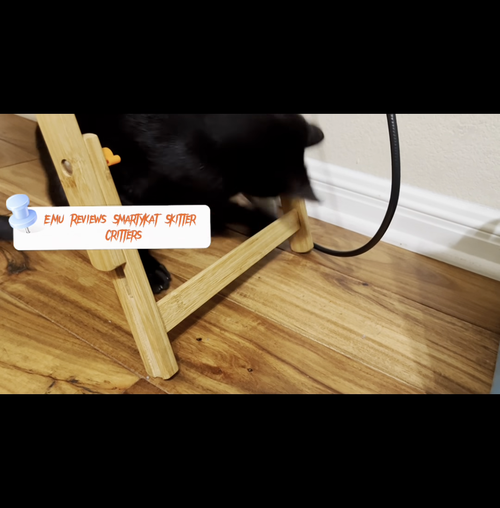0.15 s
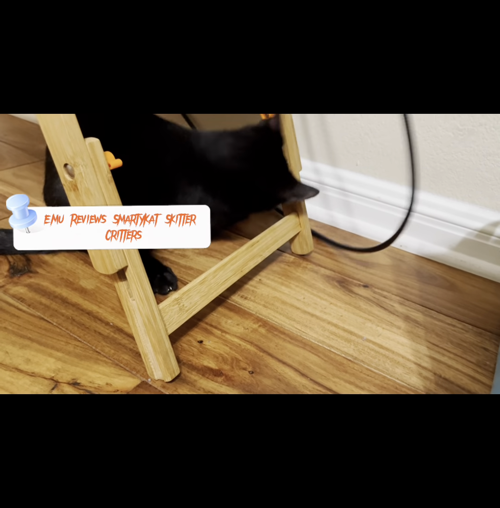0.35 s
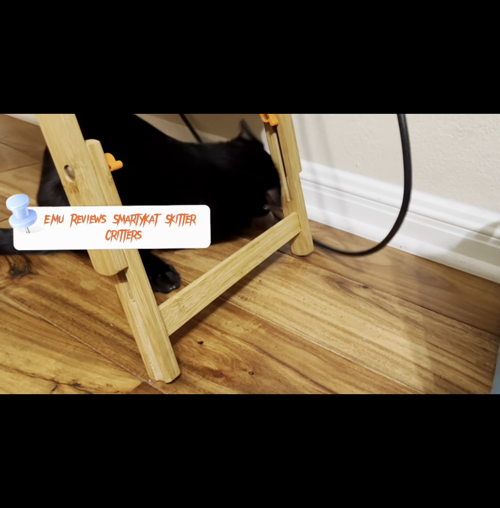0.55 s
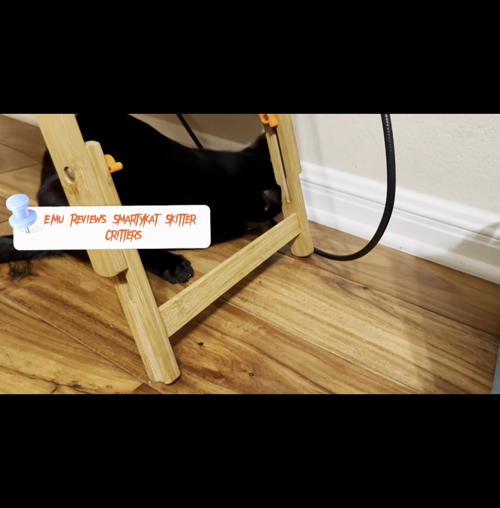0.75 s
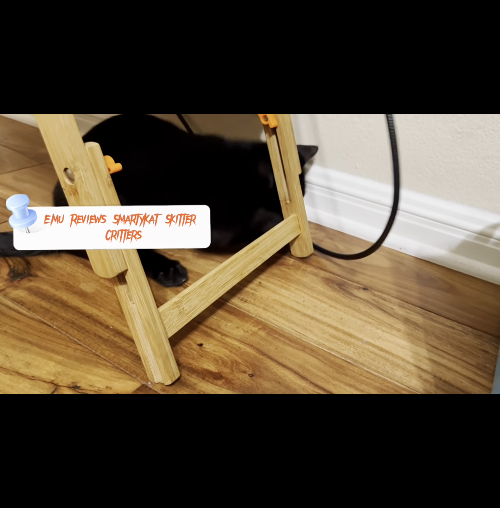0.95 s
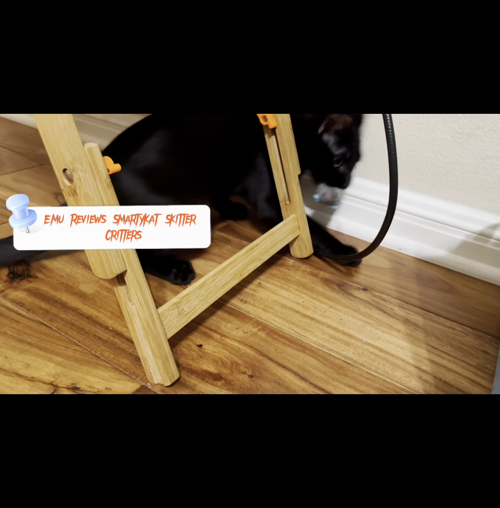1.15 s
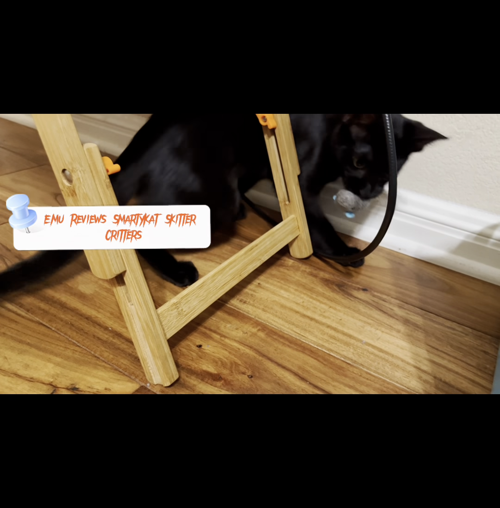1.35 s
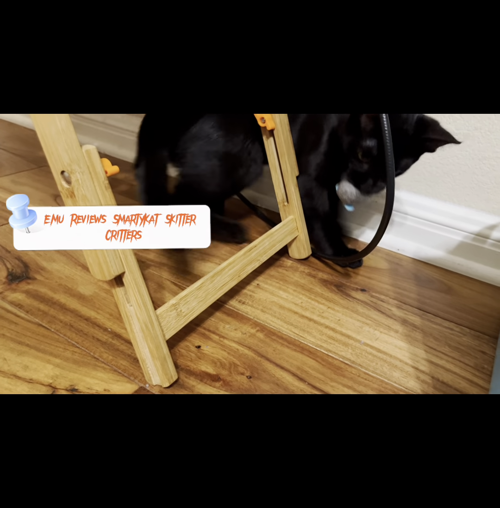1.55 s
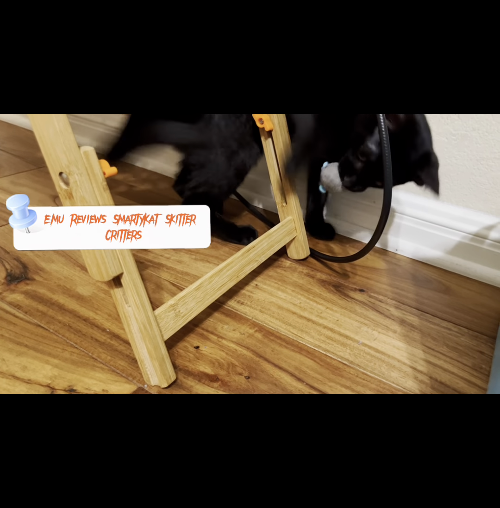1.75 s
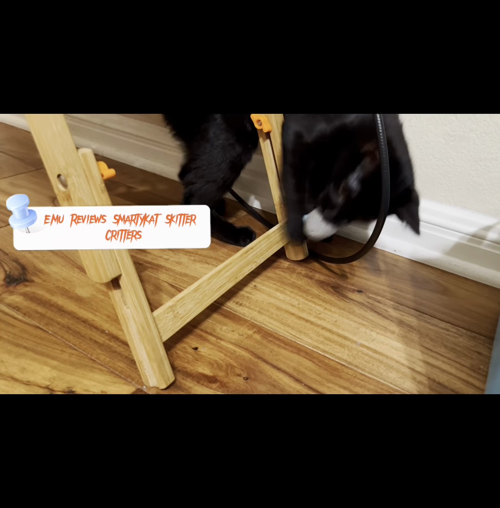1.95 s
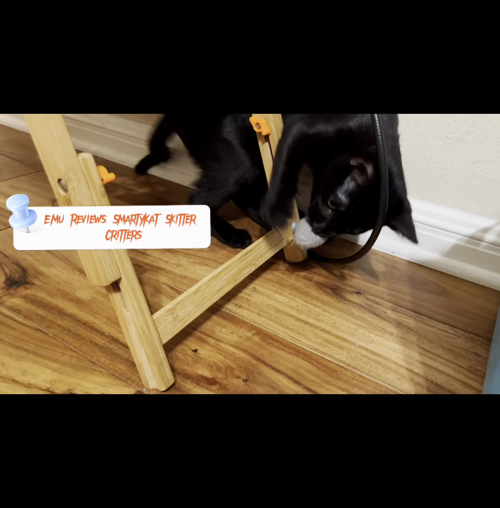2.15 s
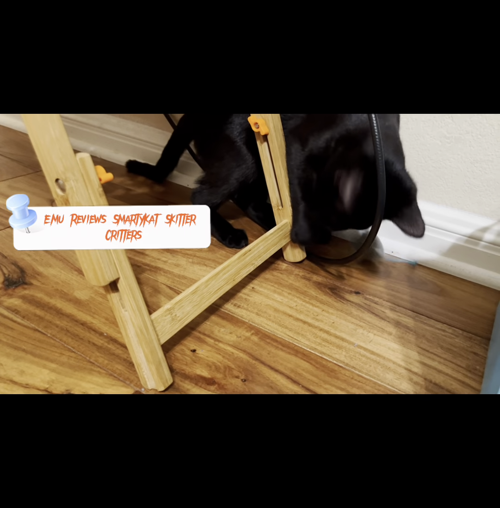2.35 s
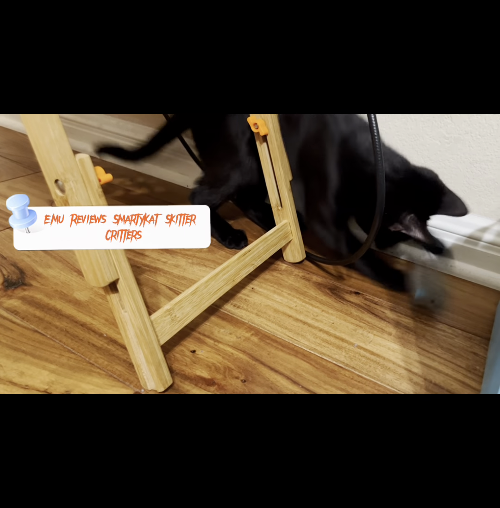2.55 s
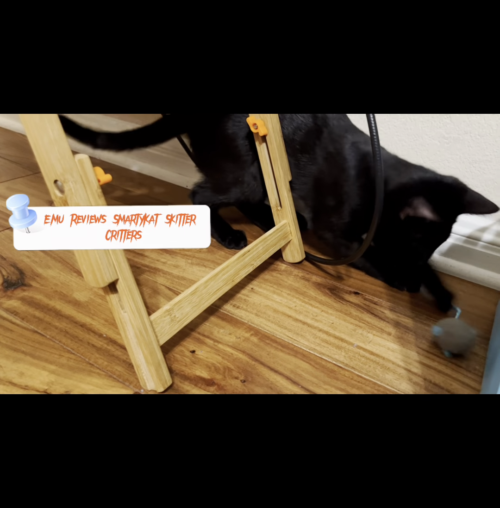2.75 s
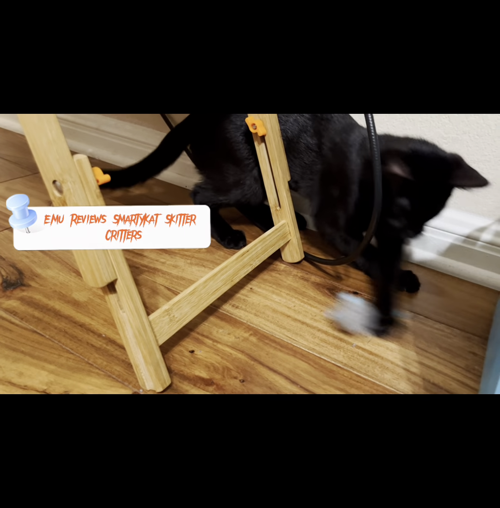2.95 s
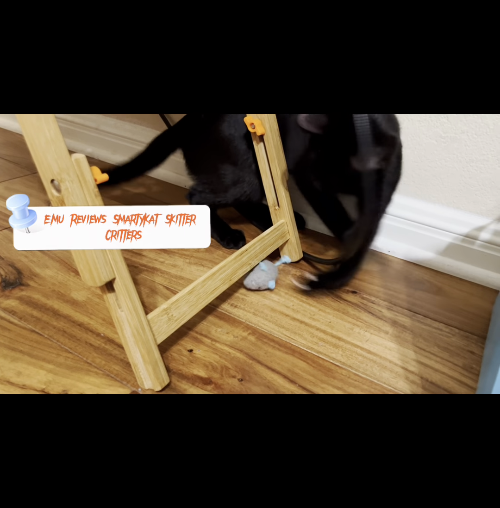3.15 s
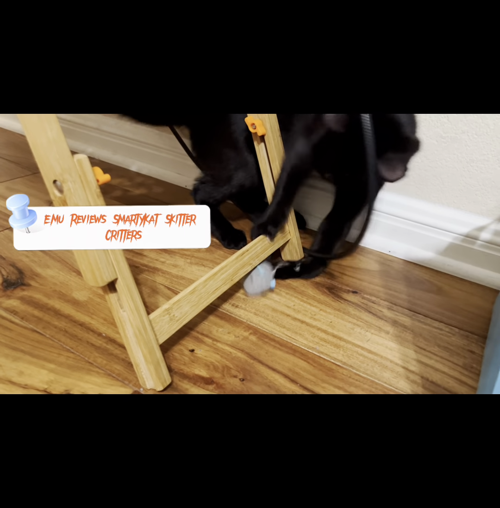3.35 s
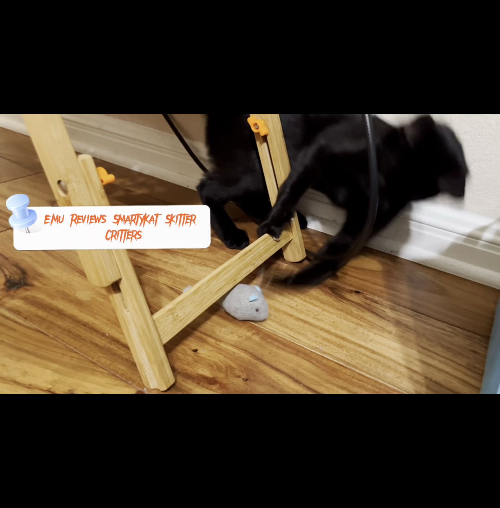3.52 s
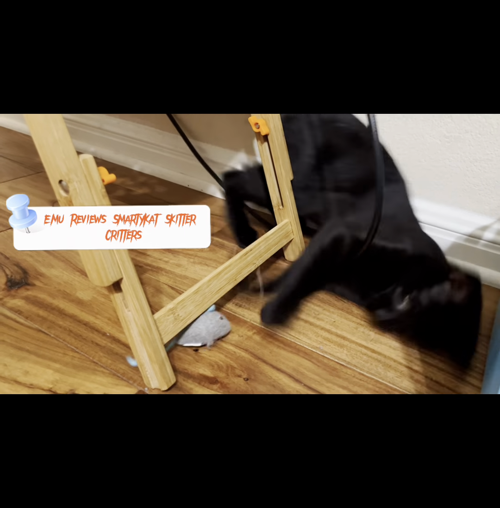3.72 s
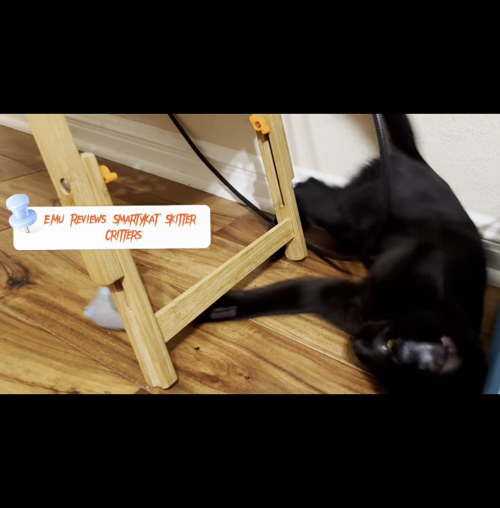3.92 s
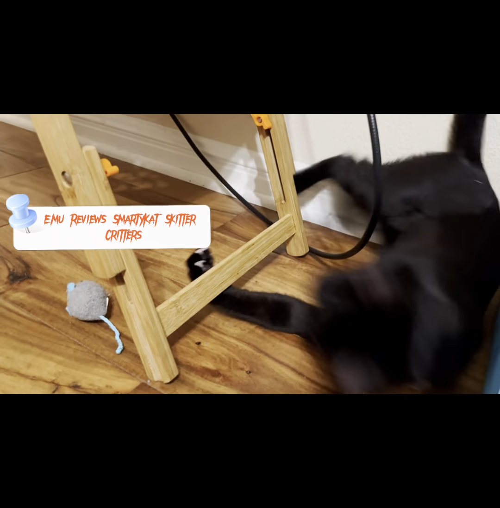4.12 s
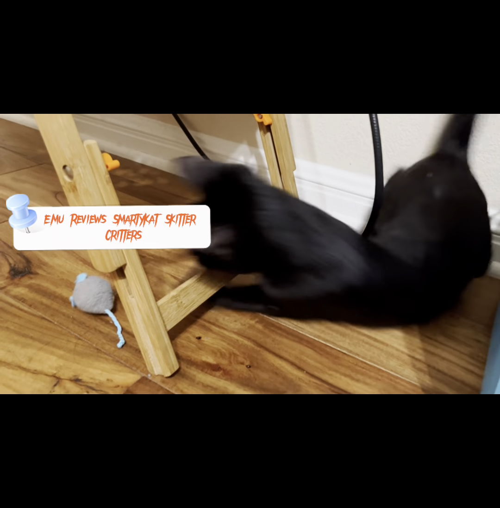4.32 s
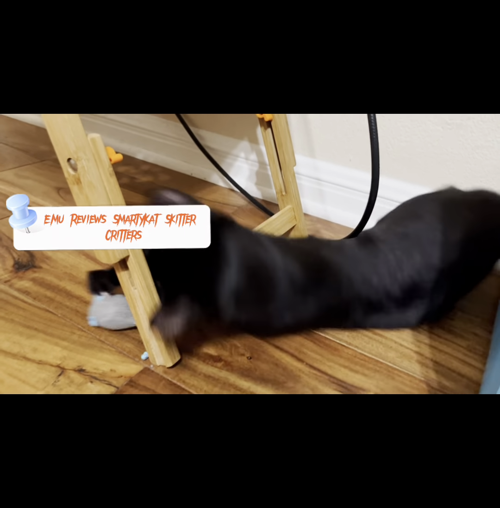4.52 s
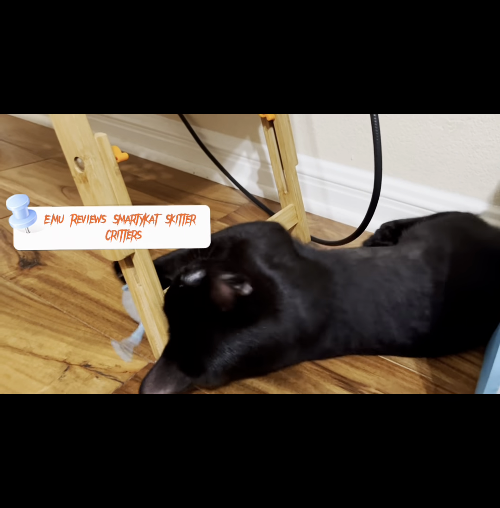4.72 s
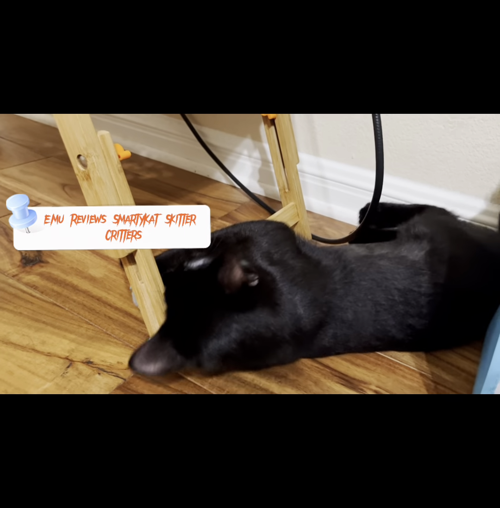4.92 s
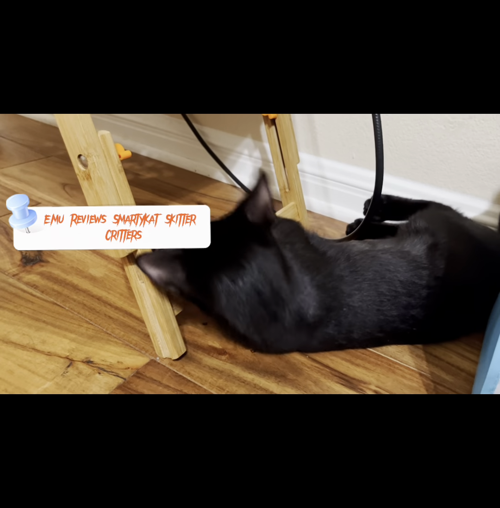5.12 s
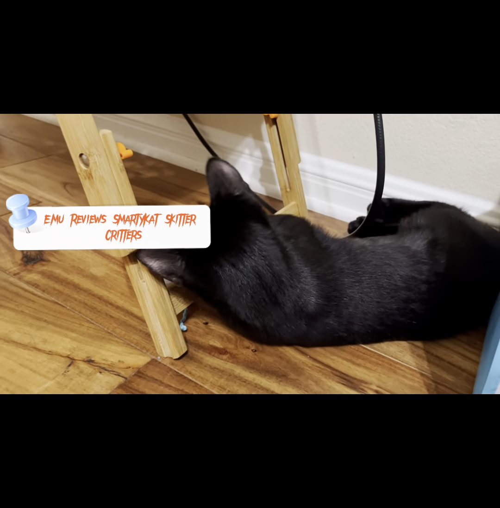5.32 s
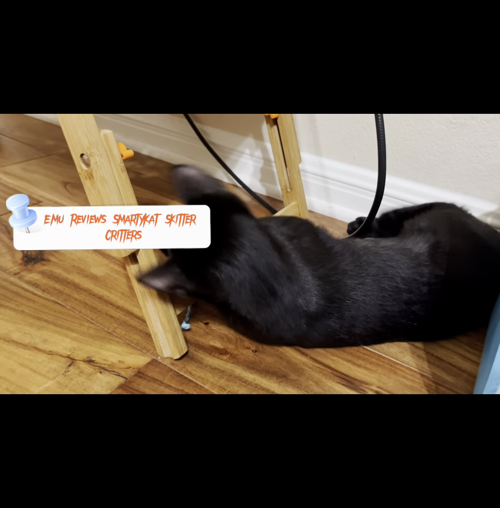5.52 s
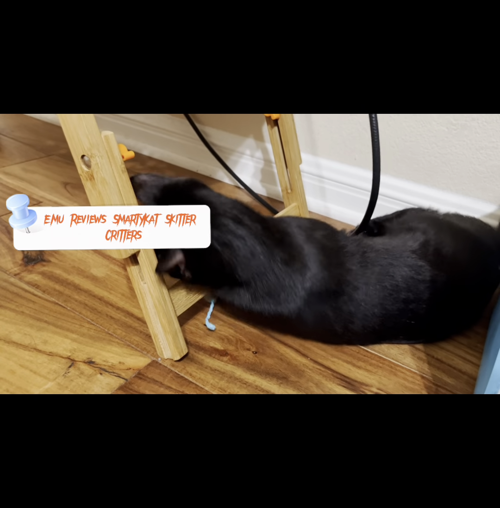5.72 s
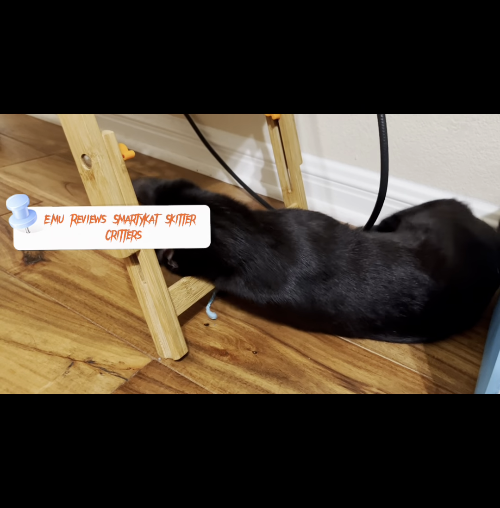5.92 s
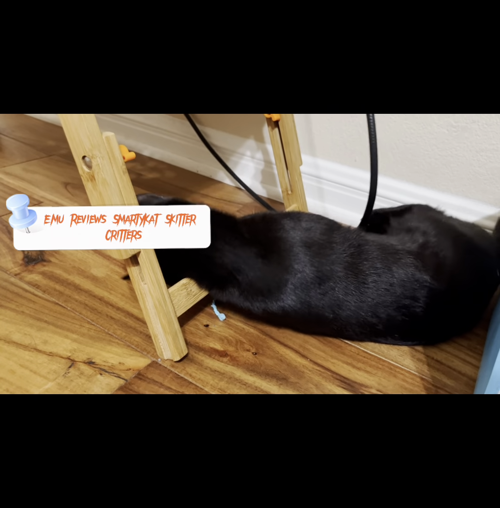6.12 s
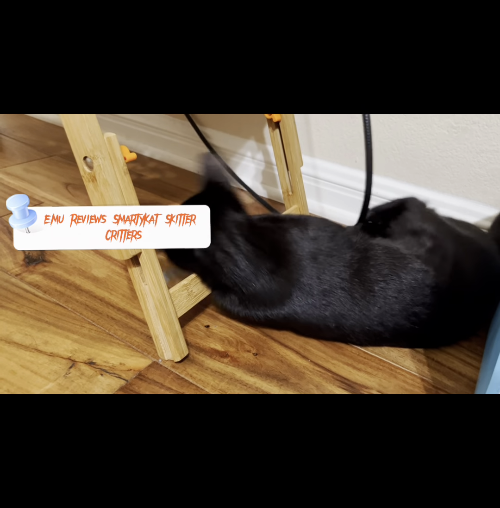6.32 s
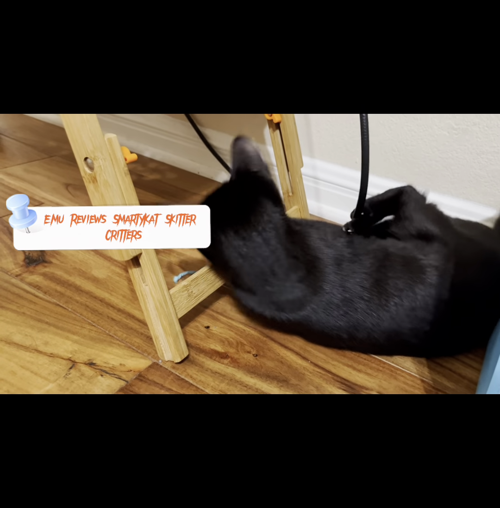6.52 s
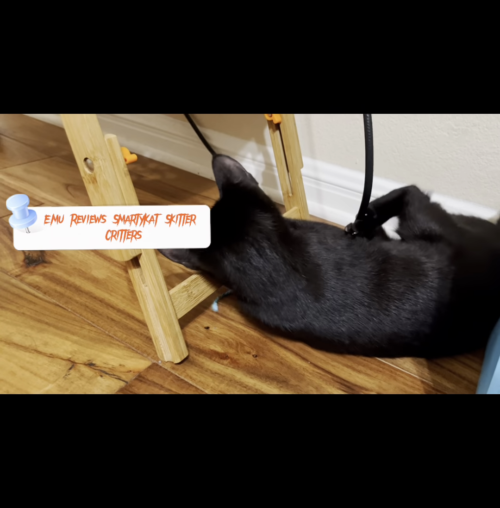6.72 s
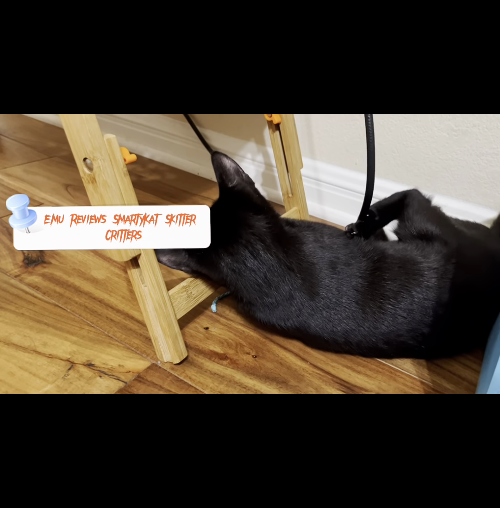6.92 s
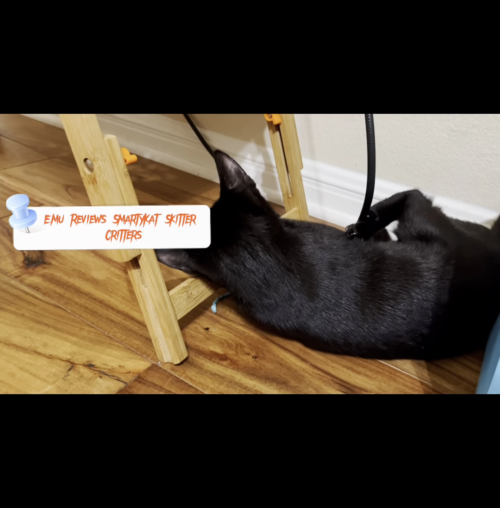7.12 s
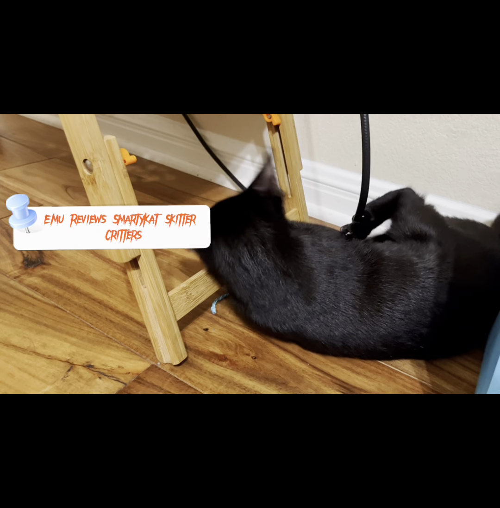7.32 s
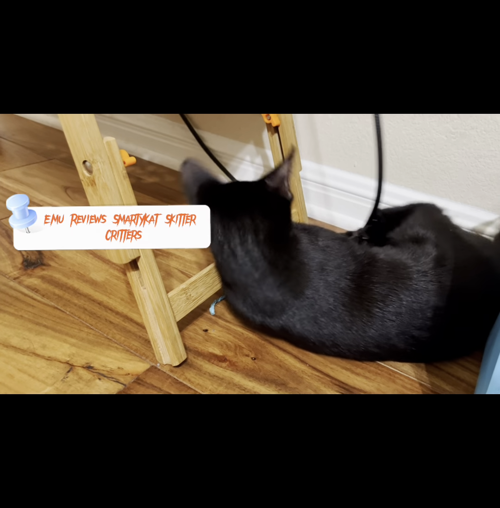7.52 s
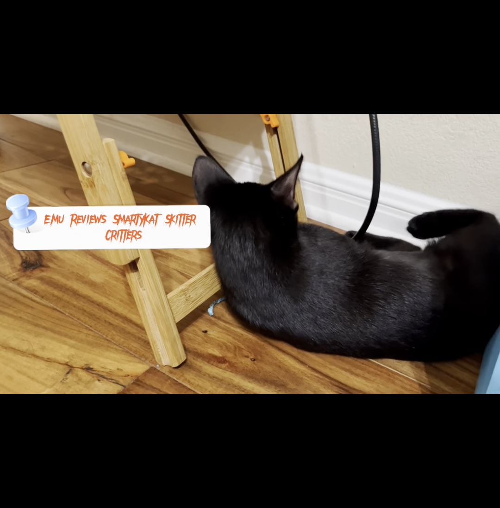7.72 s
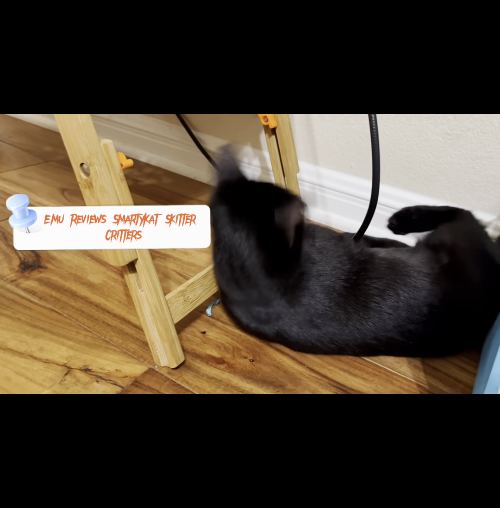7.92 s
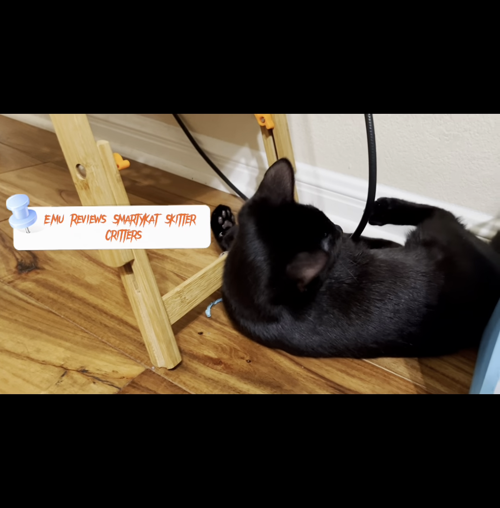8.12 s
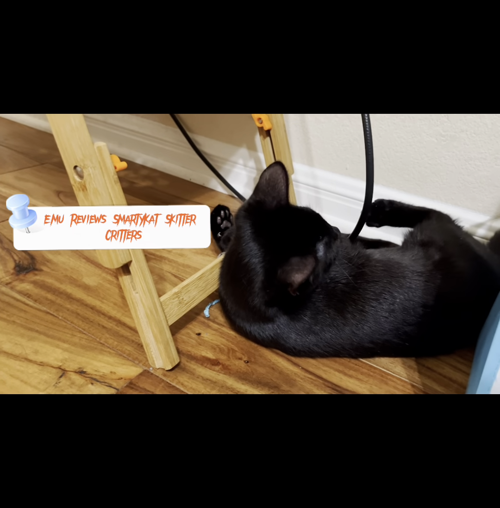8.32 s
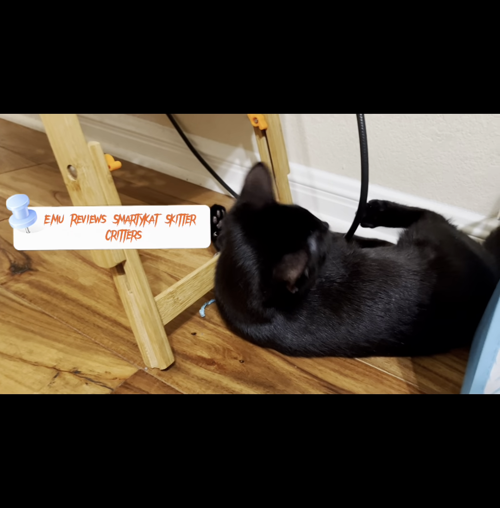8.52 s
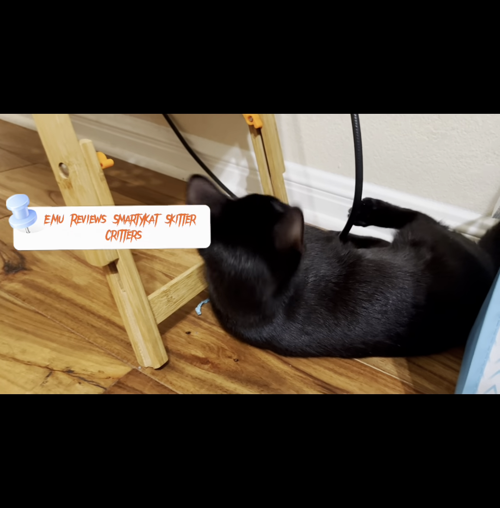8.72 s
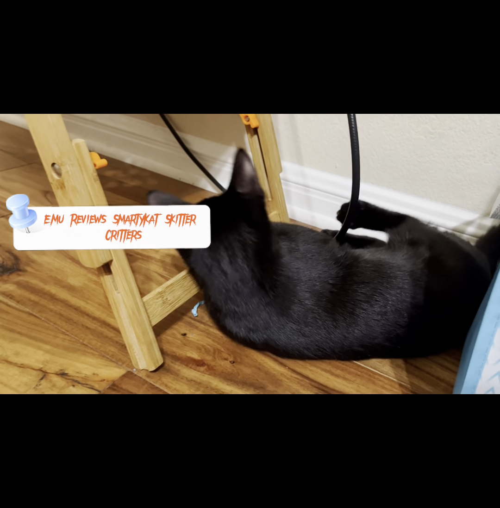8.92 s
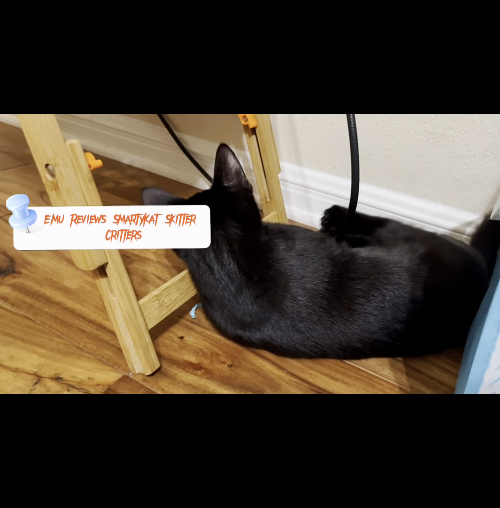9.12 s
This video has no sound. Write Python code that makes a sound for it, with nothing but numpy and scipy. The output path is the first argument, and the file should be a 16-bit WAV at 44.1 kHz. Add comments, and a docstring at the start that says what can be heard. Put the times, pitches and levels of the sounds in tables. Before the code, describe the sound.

Close phone microphone in stereo, indoors with short echoes. Grainy fur and paw slides on varnished boards mix with dry claw clicks, woody knocks and low thuds that drop in pitch. Activity comes in bursts: brisk at first, quiet, then increasingly rough up to one very loud body thump, followed by soft strokes, faint squeaky skids and finally little beyond a deep, steady airy hum.

```python
"""Over a low ventilation rumble, fur and paws slide on hardwood, at once joined by claw ticks and thuds:
a cat chases a soft toy close to a phone with two microphone ports. Slides are grainy filtered noise,
taps are short three-band bursts, some ringing a wooden stand, and thuds are tones that sweep down in the
hollow floor. Skids squeak as rough resonant noise; the rumble booms in two room resonances over a faint wash.
"""
import sys
import numpy as np
from scipy import signal
from scipy.fft import rfft, irfft, next_fast_len
from scipy.io import wavfile
from scipy.ndimage import uniform_filter1d

SR = 44100
rng = np.random.default_rng(int(sys.argv[2]) if len(sys.argv) > 2 else 0)


def unload_audio(sound):
    """Save the sound as a 16-bit wav file, at the path given as the first command line argument."""
    columns = np.transpose(np.atleast_2d(sound))
    # keep every value between -1 and 1, then stretch to whole-number steps
    steps = np.round(np.clip(columns, -1, 1) * 32767)
    wavfile.write(sys.argv[1], SR, steps.astype(np.int16))


N = 403956

# paw and body thuds: start_s (sound begins 3 ms sooner), peak_db, settling_pitch_hz, contact_s, sweep_octaves
THUD_EVENTS = [(0.095, -32.5, 169, 0.019, 1.26), (0.133, -29, 135.8, 0.0227, 0.87),
               (0.238, -14.5, 180.2, 0.01, 1.43), (0.252, -14, 178.3, 0.02, 0.81),
               (0.442, -39, 190.4, 0.0202, 1.1), (0.538, -19.5, 164, 0.025, 1.41),
               (0.609, -25, 142.4, 0.016, 1.4), (2.152, -25.5, 143, 0.014, 1.2),
               (2.519, -28, 131.5, 0.015, 1.4), (3.131, -22.5, 177, 0.014, 2.1),
               (3.162, -25, 207, 0.0215, 1.63), (3.388, -23, 174, 0.03, 1.25), (3.54, -21, 180, 0.03, 1.37),
               (3.597, -7.5, 171, 0.019, 1.81), (3.663, -18, 185, 0.017, 1.3),
               (3.768, -17.5, 180.5, 0.021, 1.63), (3.882, -16, 177, 0.016, 1.36),
               (3.952, -7.5, 171.3, 0.016, 1.57), (4.104, -2, 138.6, 0.024, 3.08),
               (4.322, -9.5, 144.5, 0.021, 1.4), (4.425, -15, 151, 0.023, 1.44),
               (6.002, -26.5, 175, 0.032, 1.7), (6.292, -23.5, 199.7, 0.023, 1.18),
               (6.353, -21.5, 146, 0.013, 1.03), (6.647, -26, 179.5, 0.0335, 2.05),
               (7.369, -33.5, 139.4, 0.014, 1.6), (7.576, -28.5, 214.6, 0.012, 1.4)]
# modes of the hollow floor: pitch_hz, width_hz, level_db
BOARD_MODES = [(107.4, 22.8, -0.5), (138.3, 8.7, 4), (185.1, 24.8, 3.5), (223.2, 36.2, -4),
               (249.7, 42, -12.5), (297.3, 48, -16.5)]
# modes of the wooden stand: pitch_hz, width_hz (scaled by each use), level_db
STAND_MODES = [(620, 54, -10.5), (934, 80, -2), (1252, 91, -6), (1520, 120, -4.5), (2153, 110, -5),
               (2490, 130, -12), (3073, 74, -5), (3837, 130, -5.5), (4240, 250, -9.5), (4550, 85, -4.5),
               (4840, 170, -10), (5870, 180, -13), (6300, 150, -14)]


def gain_of(db):
    """Turns decibels into amplitude gain."""
    return 10 ** (np.asarray(db) / 20)


def evened(x):
    """Scales a signal to rms 1."""
    return x / np.sqrt(np.mean(x ** 2) + 1e-20)


def read(points, hz):
    """Reads a spectrum table on a log-frequency axis."""
    f, value = np.transpose(points)
    return np.interp(np.log(hz + 1), np.log(f + 1), value)


def add(mix, s, sound):
    """Mixes a sound in at s seconds."""
    part = mix[round(s * SR):][:len(sound)]
    part += sound[:len(part)]


def ring(x, hz, width):
    """Rings one decaying resonance of gain 1; a wider one dies sooner."""
    r = np.exp(-np.pi * width / SR)
    return 2 * signal.lfilter([1 - r], [1, -r * np.exp(2j * np.pi * hz / SR)], x).real


def causal(db):
    """Minimum-phase impulse response for a gain in dB on rfft bins."""
    cepstrum = irfft(np.maximum(db, -100) * np.log(10) / 20)
    half = len(cepstrum) // 2
    folded = np.r_[cepstrum[0], 2 * cepstrum[1:half], cepstrum[half], np.zeros(half - 1)]
    return irfft(np.exp(rfft(folded)))[:half]


def air():
    """Faint air noise of the room: shaped noise whose spectrum drifts in patches."""
    # spectrum of the wash: pitch_hz, relative density_db per Hz
    air_spectrum = [(41, -41.5), (70, -9), (126, -4.5), (154, -15), (185, -17.5), (222, -30.5), (390, -26),
                    (479, -33), (587, -29), (703, -35), (752, -37), (902, -37), (2280, -61.5), (4290, -58),
                    (15600, -90.5)]
    # left-right likeness of the wash: pitch_hz, likeness (-1 to 1)
    air_likeness = [(60, 0.94), (130, 0.22), (290, 0.16), (640, 0.62), (1410, -0.26), (3100, -0.047),
                    (8200, -0.8), (12000, 0.8), (15000, -0.5)]
    level_db, patch_depth_db, swell_depth_db = -43.5, 2.6, 1.1
    frames, hz = N // 512 + 5, np.fft.rfftfreq(2048, 1 / SR)
    a, b, c, d, patches = rng.standard_normal((frames, 1025, 5)).T
    patches = uniform_filter1d(patches, size=20, axis=0)
    patches = evened(uniform_filter1d(patches, size=8, axis=1))
    same = np.clip(read(air_likeness, hz), -1, 1)[:, None]
    left = a + 1j * b
    right = same * left + np.sqrt(1 - same ** 2) * (c + 1j * d)
    z = np.array([left, right])
    swell = uniform_filter1d(rng.standard_normal(frames), size=14)
    swell = evened(uniform_filter1d(swell, size=8))
    upper = np.clip(hz[:, None] / 600, 0, 1)  # the swells fade out below 600 Hz
    z *= gain_of(swell_depth_db * swell * upper)
    z *= gain_of(read(air_spectrum, hz)[:, None] + patch_depth_db * patches)
    noise = signal.istft(z, nperseg=2048, noverlap=1536)[1][:, :N]
    return gain_of(level_db) * evened(noise)


def boom():
    """The lowest room resonance: noise through one mode twice, swelling and fading."""
    # swell of the boom: time_s, level_db
    boom_swell = [(0.0, -34.5), (0.18, -34), (0.79, -29), (0.92, -38.5), (1.5, -32.5), (1.55, -39.5),
                  (2.85, -31), (3.06, -41.5), (3.44, -28.5), (3.49, -45), (3.59, -30.5), (3.97, -33),
                  (4.94, -32), (6.12, -41.5), (6.879, -32), (6.93, -40.5), (9.071, -33.5), (9.15, -42.5)]
    # the lowest mode: pitch_hz, width_hz of each pass
    boom_mode = (51.04, 20.9)
    common, opposed = rng.standard_normal((2, N))
    noise = common + .25 * opposed * [[1], [-1]]  # nearly alike in both ports
    rumble = ring(ring(noise, *boom_mode), *boom_mode)
    # flatten the slow level so that the swell alone sets it
    rumble /= np.sqrt(uniform_filter1d((rumble ** 2).mean(0), size=9000))
    s, swell_db = np.transpose(boom_swell)
    return rumble * gain_of(np.interp(np.arange(N) / SR, s, swell_db))


def hum():
    """The second room resonance: steady noise through one narrow mode twice."""
    # the second mode: pitch_hz, width_hz of each pass, level_db
    hum_mode = (122, 10.8, -44.5)
    hz, width, level_db = hum_mode
    return gain_of(level_db) * evened(ring(ring(rng.standard_normal(N), hz, width), hz, width))


def wash():
    """The ventilation rumble: air noise plus two booming resonances, a little stronger on the right."""
    return air() + (boom() + hum()) * gain_of([[-.3], [.3]])


def stroke_controls(time):
    """Overlapping strokes add in power; power weights the brightness; thuds leave the boards drumming."""
    # strokes of fur and paws: peak_s, build_up_s, die_away_s, swish_db, brightness_db_per_octave, drumming_db
    stroke_events = [(0.04, 0.42, 0.59, -47, 1, -38.5), (0.156, 0.085, 0.053, -39, 0.5, -45.5),
                     (0.225, .06, 0.23, -42.5, -1, -36), (0.302, 0.074, 0.18, -45.5, -3.5, -30.5),
                     (0.435, 0.031, 0.27, -49.5, 0.5, -40), (0.542, 0.14, 0.17, -46.5, 1, -27),
                     (0.631, 0.15, 0.083, -50, -10, -29.5), (0.84, 0.059, 0.22, -56, 0.5, -63.5),
                     (0.916, 0.23, 0.07, -48, 0, -58), (1.024, 0.13, 0.067, -53.5, -1, -45.5),
                     (1.19, 0.26, 0.04, -60, 3, -68), (1.295, 0.11, 0.067, -57.5, 2.5, -71),
                     (1.447, 0.022, 0.035, -67.5, 6.5, -76), (1.552, 0.017, 0.039, -62.5, 4.5, -70),
                     (1.598, .02, .04, -71, 8, -76), (1.914, 0.019, 0.13, -39.5, 0, -40),
                     (2.106, 0.081, 0.078, -45, -1, -38), (2.32, 0.3, 0.14, -55.5, -2.5, -46),
                     (2.43, 0.087, 0.19, -53.5, 1.5, -65), (2.523, 0.028, 0.07, -39, 2, -45),
                     (2.602, 0.14, 0.12, -55, 1, -43), (2.794, 0.006, 0.063, -47.5, 0.5, -34),
                     (2.86, 0.05, 0.1, -46.5, 3, -61), (2.93, 0.1, 0.069, -49, 3.5, -64),
                     (3.03, .02, 0.076, -57, -2.5, -59), (3.09, 0.028, 0.037, -45.5, 3.5, -53),
                     (3.151, 0.045, 0.26, -42, -4.5, -31), (3.233, 0.26, 0.35, -56.5, -7, -27.5),
                     (3.315, 0.019, 0.07, -37.5, 3, -33.5), (3.44, 0.12, 0.55, -50.5, 1.5, -46),
                     (3.528, 0.1, 0.1, -44, 5, -35.5), (3.579, 0.084, 0.19, -37.5, -3.5, -20.5),
                     (3.672, 0.022, 0.17, -35, -0.8, -20.5), (3.836, 0.2, 0.085, -37.5, -0.5, -31.5),
                     (3.962, 0.086, 0.14, -40, 0, -28), (4.118, 0.12, 0.23, -45, -1.5, -33),
                     (4.363, 0.061, 0.12, -36, 0, -27.5), (4.558, 0.17, 0.14, -37.5, -1.5, -31),
                     (4.72, 0.19, 0.19, -53.5, -1, -61), (4.87, 0.12, 0.18, -61, 0.5, -60),
                     (5.12, 0.5, 0.19, -62.5, 2, -64.5), (5.53, 0.055, 0.38, -51.5, -1, -65),
                     (5.629, 0.13, 0.17, -51, 4.5, -42.5), (5.81, 0.19, 0.085, -52.5, 1.5, -68),
                     (6.0, 0.14, 0.065, -52.5, -2, -39), (6.2, 0.34, 0.64, -62.5, -5, -46),
                     (6.282, 0.019, 0.054, -39.5, -7.5, -30.5), (6.427, 0.36, 0.69, -50.5, -1.5, -48),
                     (6.66, 0.31, 0.2, -65.5, -11, -39), (7.306, 0.029, .4, -63, -13, -44.5),
                     (7.445, 0.22, 0.092, -54, -2, -44), (7.569, 0.084, 0.19, -54, -3.5, -39.5),
                     (7.663, 0.26, 0.075, -47.5, -3.5, -42), (8.975, 0.25, 0.45, -69.5, -1, -50.5)]
    range_db = 20  # how far a stroke climbs in its build-up and sinks in its die-away
    rounding = 1.35  # above 1 a stroke holds near its peak, then stops fast
    rest_swish_db, rest_drum_db = -75.5, -57.5  # the cat at rest still shifts a little
    rumble_db, rumble_fall_db_per_s = -8, 199  # drumming after a thud: level re its peak, fall
    peak, rise, fall, swish_db, bright, drum_db = np.transpose(stroke_events)[:, :, None]
    late = time - peak
    before, after = -late / np.maximum(rise, .005), late / np.maximum(fall, .005)
    shape_db = -range_db * np.where(late < 0, before, after) ** rounding
    power = gain_of(swish_db + shape_db) ** 2
    swish = power.sum(0) + gain_of(rest_swish_db) ** 2
    s, thud_db = np.transpose(THUD_EVENTS)[:2, :, None]
    rumble = gain_of(thud_db + rumble_db - rumble_fall_db_per_s * abs(time - s)) * (time > s)
    drum = (gain_of(drum_db + shape_db) ** 2).sum(0) + (rumble ** 2).sum(0) + gain_of(rest_drum_db) ** 2
    return np.sqrt(swish), (power * bright).sum(0) / swish, np.sqrt(drum)


def phone_colour():
    """Unit-energy response of floor, air and phone to a scratch."""
    # scratch spectrum as the phone hears it: pitch_hz, relative density_db per Hz
    scratch_spectrum = [(200, -24.5), (350, -9.5), (650, 0), (950, -8.5), (1400, -10), (2100, -13.5),
                        (3500, -17.5), (5500, -22), (7200, -22), (9300, -27), (11800, -23.5),
                        (14000, -28.5), (15600, -32), (17000, -62.5)]
    colour = causal(read(scratch_spectrum, np.fft.rfftfreq(4096, 1 / SR)))
    return colour / np.linalg.norm(colour)


def rubbed(swish):
    """Where fur drags along the stand, part of the swish sings in its modes."""
    # drags along the stand: start_s, end_s, share of the swish that sings (0 to 1)
    rub_events = [(1.9, 2.06, .4), (2.41, 2.5, .4), (3.06, 3.11, .4), (3.3, 3.35, .45), (3.42, 3.48, .35),
                  (3.52, 3.59, .4), (3.78, 3.87, .4), (5.48, 5.88, .5), (7.29, 7.72, .25)]
    share = np.zeros(N)
    for start, end, most in rub_events:
        add(share, start, most * signal.windows.tukey(round((end - start) * SR), .3))
    steps = np.arange(0, N + 2000, 2000)
    drift = gain_of(3.0 * rng.standard_normal((len(steps), len(STAND_MODES)))).T  # the rubbed spot wanders
    singing = np.zeros(N)
    for (hz, width, db), spot in zip(STAND_MODES, drift):
        mode = ring(ring(swish, hz, 1.6 * width), hz, 3 * width)  # fur damps it, so it is wide
        singing += gain_of(db) * np.interp(np.arange(N), steps, spot) * mode
    return (1 - share) * swish + share * 0.86 * evened(singing) * np.std(swish)


def swishing(s, bright):
    """Dense uneven grains of fur and pad on varnish, tilted in brightness and coloured by the phone."""
    grain = gain_of(2.0 * np.minimum(rng.exponential(1, N), 6))  # some hairs and claws catch harder
    slips = gain_of(1.37 * evened(uniform_filter1d(rng.standard_normal(N), size=200)))
    noise = evened(rng.standard_normal(N) * grain * slips)
    hz, t, z = signal.stft(noise, SR, nperseg=256, noverlap=192)
    patches = uniform_filter1d(rng.standard_normal(z.shape), size=4, axis=0)
    patches = uniform_filter1d(patches, size=25, axis=1)
    octaves = np.log2(np.maximum(hz[:, None], 1300.) / 3000)  # the tilt pivots at 3 kHz
    tilt_db = octaves * np.interp(t, s, bright) + 2.56 * evened(patches)
    plain = signal.istft(z * gain_of(tilt_db), SR, nperseg=256, noverlap=192)[1][:N]
    return rubbed(signal.oaconvolve(plain, phone_colour())[:N])


def drumming():
    """Rubbing shakes the boards: uneven noise rings each floor mode twice."""
    unevenness = gain_of(3.58 * evened(uniform_filter1d(rng.standard_normal(N), size=900)))
    bumps = rng.standard_normal(N) * unevenness
    return evened(sum(gain_of(db) * ring(ring(bumps, f, w), f, 2.2 * w) for f, w, db in BOARD_MODES))


def slides():
    """Friction: strokes set the level of the swish and of the drumming boards below it."""
    s = np.arange(0, N / SR, .002)
    swish_gain, bright, drum_gain = stroke_controls(s)
    time = np.arange(N) / SR
    swish = swishing(s, bright) * np.interp(time, s, swish_gain)
    return swish + drumming() * np.interp(time, s, drum_gain)


def stand(x, spot_db):
    """The wooden stand rings at its modes, damped by the paw or toy on it; the struck spot favours some."""
    return sum((-1) ** k * gain_of(db + spot_db[k]) * ring(x, f, 0.81 * w)
               for k, (f, w, db) in enumerate(STAND_MODES))


def taps():
    """Short scratchy bursts in three bands; the first contact also strikes the stand, each at another spot."""
    # claw and toy taps: start_s, clack_db (loudest 3 ms), knock_db and tick_db re clack,
    # t60_s (held to 0.008-0.15), share of the energy that rings the stand (0 to 1)
    tap_events = [(0.017, -53.5, -9.5, 9.5, 0.056, 0.5), (0.0855, -41.5, -11, -4.5, 0.032, 0),
                  (0.1060, -26.5, -6.5, 5, 0.016, 0.28), (0.138, -30, 3, -11, 0.063, 0),
                  (0.2293, -27.5, 4, -18, 0.034, 0.01), (0.2902, -23, -4, -5.5, 0.026, 0.53),
                  (0.4245, -40.5, 7.5, -36, 0.022, 0.14), (0.505, -34, -1.5, -6, 0.035, 0),
                  (0.5322, -22.5, 5, -23, 0.018, 0.18), (0.6226, -43, 9, -7, 0.017, 0.3),
                  (1.7385, -64, -6.5, 1, 0.026, 0.24), (1.903, -30.5, -17, 3, .036, 0.94),
                  (1.92, -41, -5, -14, 0.031, .6), (1.937, -42.5, -15, 8, 0.035, 0.36),
                  (2.098, -40, -21, -27, 0.041, 0.16), (2.1797, -42, -5, -6.5, 0.0093, 0.4),
                  (2.2254, -34, -14, -5, 0.024, 0.6), (2.2869, -45, 5, -25, 0.027, 0.57),
                  (2.307, -55, -15, 3, .025, 0.8), (2.315, -38, -28, -11, 0.022, 0),
                  (2.331, -48, -10, -14, 0.018, .4), (2.343, -45.5, -18, 1.5, 0.03, 0.5),
                  (2.358, -53, -15, -3, .025, 0.6), (2.4204, -51, -14, 11.5, 0.038, 0.73),
                  (2.502, -52.5, -2, 13, 0.039, 0.4), (2.588, -32.5, -10, -6, 0.035, 0.2),
                  (2.799, -37, -7, -11, 0.084, 0), (2.8262, -46.5, -1, 3, 0.082, 0.3),
                  (3.017, -50, 2, -16, 0.098, 0), (3.1132, -41.5, 11.5, -4, 0.036, 0.3),
                  (3.136, -36, -20, -20, 0.046, 0.03), (3.149, -33.5, -2, -9.5, 0.037, 0.5),
                  (3.18, -46, 2, -1, 0.044, 0.2), (3.2066, -29, 3, -13.5, 0.035, 0.5),
                  (3.245, -38, 6.5, -5, 0.034, 0.3), (3.304, -42.5, -16, 3, 0.052, 0.84),
                  (3.3485, -36, 0.5, -28, 0.049, 0.14), (3.365, -42, 7, -31, 0.022, 0.3),
                  (3.4116, -44, -2, -29, 0.031, 0.13), (3.5235, -35, 2.5, -21, 0.054, 0.1),
                  (3.5647, -34.5, 2, -29, 0.11, 0.8), (3.5945, -41, 15, -9, 0.029, 0.04),
                  (3.6149, -25, 5, -21, 0.035, 0.01), (3.6636, -23, 2, -10, 0.023, 0.34),
                  (3.681, -36, 10.5, 2, 0.031, 0), (3.703, -33.5, -6, -2, 0.038, 0.9),
                  (3.707, -31, 8.5, -5, 0.023, 0.75), (3.7509, -34, 7, -16.5, 0.021, 0.2),
                  (3.87, -51, 4, 7.5, 0.05, 0.3), (3.887, -46, 16, -13, 0.032, 0),
                  (3.9469, -27.5, 1.5, -5.5, 0.019, 0.55), (3.952, -28.5, 5.5, -15, 0.012, 0.02),
                  (4.102, -28.5, 12, -23, 0.018, 0.25), (4.141, -57, -10, -2, 0.016, 0.4),
                  (4.3575, -36.5, 11, -12, 0.084, 0.57), (4.371, -28, -26, -21, 0.06, 0.01),
                  (4.5225, -41, 11, -22, 0.018, 0.2), (4.551, -33.5, -9, -24, 0.04, 0.05),
                  (5.9869, -40, 6.5, -15, 0.032, 0.13), (6.271, -47, -2, -12.5, 0.026, 0.1),
                  (6.2788, -42.5, 14, -1.5, 0.04, 0.04), (6.324, -62, -10, 8, .015, 0),
                  (6.356, -42.5, -21, -14, 0.087, 0.3), (6.4172, -39, -10, 5.5, 0.0077, 0.03),
                  (6.4237, -32, 0, -3.5, 0.051, 0), (6.4763, -46, 9.5, -28, 0.17, 0.67),
                  (6.6306, -48.5, 13, -10.5, 0.053, 0), (6.6589, -47, 14, -11, 0.048, 0),
                  (7.553, -63, 3, -19, 0.05, 0.4), (7.572, -61, -3, -14, 0.032, 0.2),
                  (7.605, -54, 11, -21, 0.061, 1), (7.9186, -68, 3, -12, .03, .5)]
    # bands of clack, knock of wood, tick of claw: low_hz, high_hz
    tap_bands = [(1300, 3400), (450, 1400), (3400, 15600)]
    out, t = np.zeros(N), np.arange(4000) / SR
    filters = [signal.butter(3, band, "bandpass", fs=SR, output="sos") for band in tap_bands]
    colour = phone_colour()[:500]
    draws = rng.standard_normal((len(tap_events), len(t) + len(STAND_MODES)))
    for (s, db, knock_db, tick_db, t60, ringing), draw in zip(tap_events, draws):
        noise, spot = draw[:len(t)], draw[len(t):]
        crack = 1 + 1.8 * np.exp(-t / 0.00054)  # the first contact is the hardest
        decay = gain_of(-60 * t / np.clip(t60, .008, .15))
        burst = noise * crack * decay * (1 - np.exp(-t / 0.00036))
        blow = (t == 0) + .08 * burst
        share = np.clip(ringing, 0, 1)
        scratch = evened(np.convolve(burst, colour)[:len(t)])
        struck = np.sqrt(1 - share) * scratch + np.sqrt(share) * evened(stand(blow, 2.1 * spot))
        for sos, band_db in zip(filters, (db, db + knock_db, db + tick_db)):
            part = signal.sosfilt(sos, struck)
            loudest = np.sqrt(uniform_filter1d(part ** 2, size=130).max())
            add(out, s, gain_of(band_db) * part / loudest)
    return out


def thuds():
    """Bending waves: high pitches arrive first, so a blow sweeps down, then the board modes ring on."""
    settle_s, swell_shape = 0.0037, 1.37  # time constant of the sweep; wider sweeps swell faster
    out, t = np.zeros(N), np.arange(9000) / SR
    for s, db, hz, contact, octaves in THUD_EVENTS:
        turns = np.cumsum(hz * 2 ** (octaves * np.exp(-t / settle_s))) / SR
        progress = np.minimum(t / np.clip(contact, .008, .06), 1)
        swell = np.sin(np.pi * progress ** (swell_shape / np.clip(octaves, 1, 4)))
        sweep = swell * np.sin(2 * np.pi * turns)
        ringing = sum(gain_of(mode_db) * ring(sweep, f, w) for f, w, mode_db in BOARD_MODES)
        thud = sweep + 0.43 * ringing
        add(out, s - .003, gain_of(db) * thud / abs(thud).max())
    return out


def skids():
    """Uneven stick-slip grains in one broad resonance, swelling and stopping."""
    # pads skid on the varnish: start_s, end_s, level_db, centre_hz, width_hz of each pass
    skid_events = [(3.133, 3.19, -44, 1290, 900), (3.341, 3.379, -36, 1260, 890),
                   (3.519, 3.546, -35.5, 1270, 890), (4.486, 4.615, -47.5, 2370, 1200),
                   (7.303, 7.381, -57, 1311, 1480), (7.408, 7.468, -58, 1300, 1500),
                   (7.516, 7.592, -46, 1290, 1070), (7.54, 7.597, -56, 2660, 200),
                   (7.592, 7.714, -53, 1930, 1990), (8.603, 8.708, -66, 1100, 1510),
                   (8.93, 9.04, -70.5, 1500, 1960)]
    out = np.zeros(N)
    for start, end, db, hz, width in skid_events:
        noise, slips = rng.standard_normal((2, round((end - start) * SR)))
        rough = noise * gain_of(0.93 * evened(uniform_filter1d(slips, size=90)))
        rough = ring(ring(rough, hz, width), hz, width)
        # the stand beside them rings along
        rough = evened(rough) + evened(stand(rough, 5.3 * slips[:len(STAND_MODES)]))
        add(out, start, gain_of(db) * evened(rough) * signal.windows.tukey(len(noise), .6))
    return out


def room(x):
    """Echoes: sparse impulses of random sign, each frequency dying at its own speed."""
    # reverberation: pitch_hz, t60_s
    room_decay = [(150, 0.34), (1000, 0.28), (5000, 0.21), (12000, 0.072)]
    count = SR // 2
    echo = np.zeros((2, count))
    at = np.arange(120, count - 20, 20) + rng.integers(0, 20, (2, (count - 121) // 20))
    np.put_along_axis(echo, at, rng.choice([-1., 1.], at.shape), 1)
    hz, t, z = signal.stft(echo, SR, nperseg=256)
    decay = gain_of(-60 * t / read(room_decay, hz)[:, None])
    tail = signal.istft(z * decay, SR, nperseg=256)[1]
    bass = signal.lfilter([.03], [1, -.97], tail, axis=1)
    treble = signal.sosfilt(signal.butter(3, 5000, "highpass", fs=SR, output="sos"), tail)
    # bass reaches both ports alike; treble comes mostly one way
    tail = tail - bass + bass[0] + 0.9 * (treble[0] - treble)
    return signal.fftconvolve(x[None], tail / np.linalg.norm(tail[0]), axes=1)[:, :N]


def ports(x):
    """The two ports hear a near source with their own phase and level."""
    # phase between the ports: pitch_hz, left_lead_radians
    port_phase = [(60, -1.5), (250, 0.71), (400, -1), (600, -2.5), (900, -5.5), (1500, -4.5), (1900, -5.5),
                  (4650, -5.5), (7240, -8), (8250, -10), (10000, -11.5), (11100, -12), (13000, -12),
                  (14000, -15), (15400, -16)]
    # level between the ports: pitch_hz, left_minus_right_db
    port_balance = [(60, 4), (110, -1), (200, -4.5), (380, -1.5), (700, 4), (1290, -2), (2380, 1),
                    (4400, 4.5), (8120, 0.5), (15000, -0.5)]
    size = next_fast_len(N + 4096)
    hz = np.fft.rfftfreq(size, 1 / SR)
    # each port takes half of the difference
    half = np.exp(.5j * read(port_phase, hz)) * gain_of(read(port_balance, hz) / 2)
    return irfft(rfft(x, size) * np.array([half, 1 / half]), size)[:, :N]


def scene():
    """The cat, direct and through the room, over the wash; the thuds stay mostly in the floor."""
    thumps = thuds()
    scuffs = slides() + skids() + taps()
    echoes = room(scuffs + gain_of(-6.5) * thumps)
    return ports(scuffs + thumps + gain_of(-12.5) * echoes) + wash()


def record(dry):
    """The microphone drops the deepest bass and clips at full scale; then the treble is band-limited."""
    edge_hz = 15700
    thinned = signal.sosfilt(signal.butter(3, 33, "highpass", fs=SR, output="sos"), dry)
    clipped = np.clip(thinned, -1, 1)
    lowpass = signal.firwin(511, edge_hz, window=("kaiser", 9), fs=SR)
    return signal.oaconvolve(clipped, lowpass[None], "same")


dry = scene()
out = record(dry)
unload_audio(out)
```